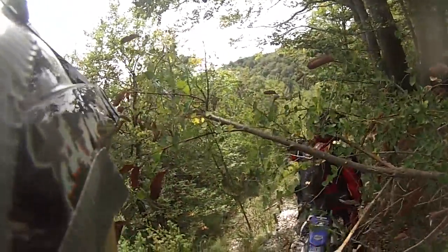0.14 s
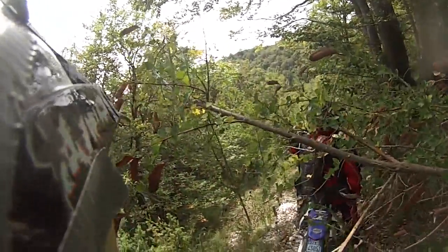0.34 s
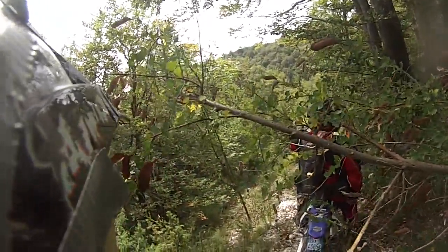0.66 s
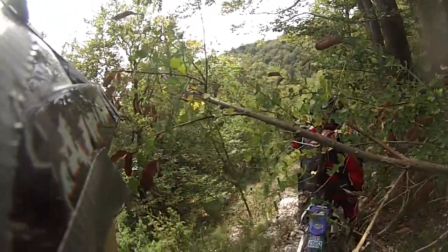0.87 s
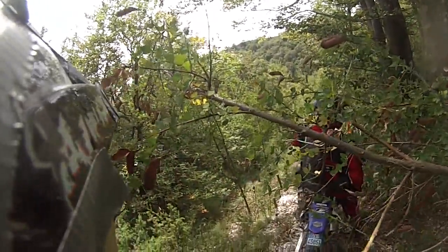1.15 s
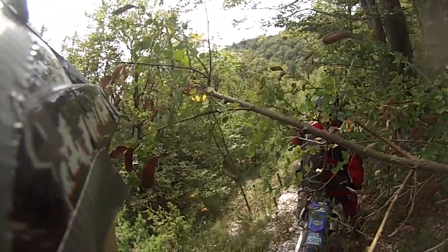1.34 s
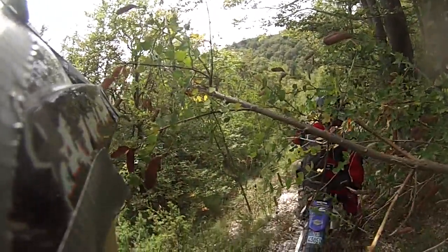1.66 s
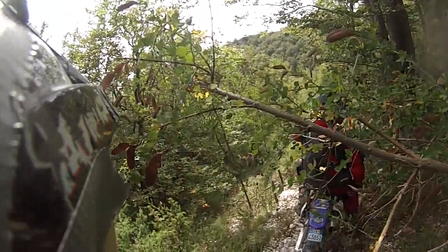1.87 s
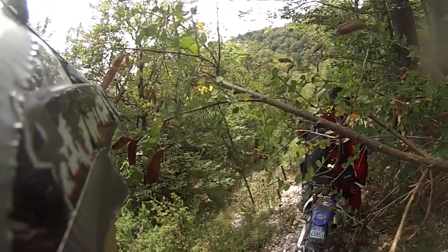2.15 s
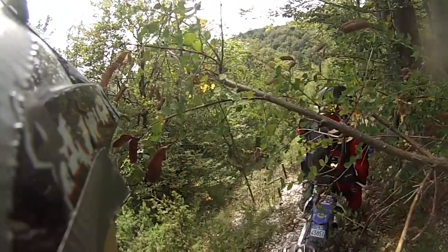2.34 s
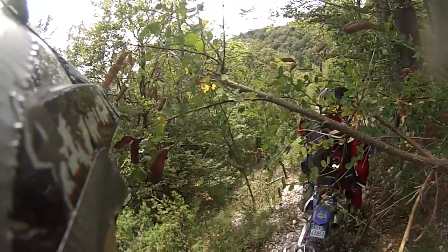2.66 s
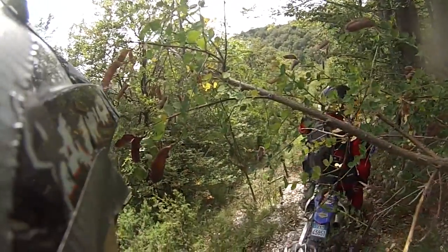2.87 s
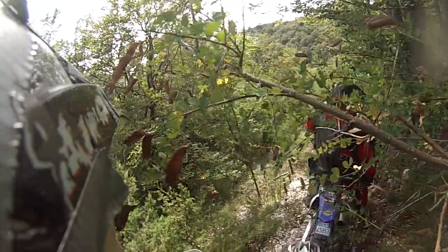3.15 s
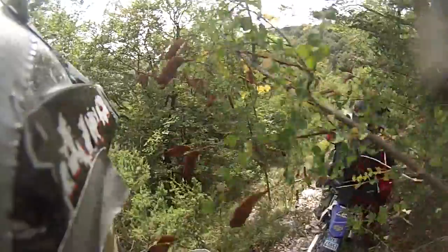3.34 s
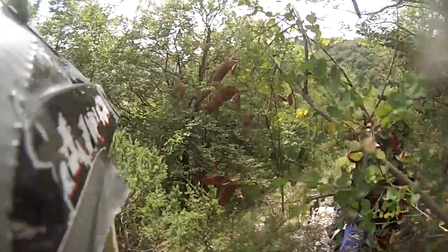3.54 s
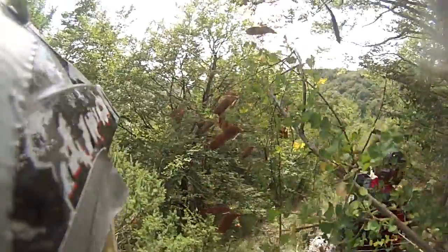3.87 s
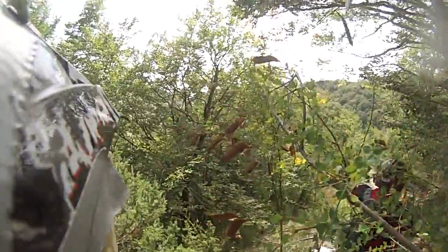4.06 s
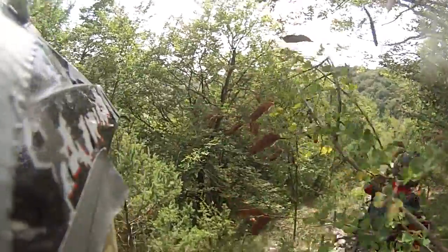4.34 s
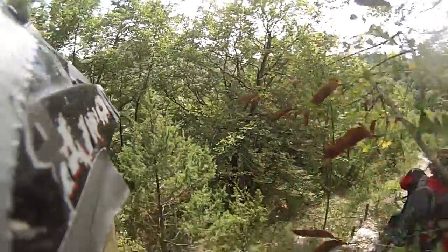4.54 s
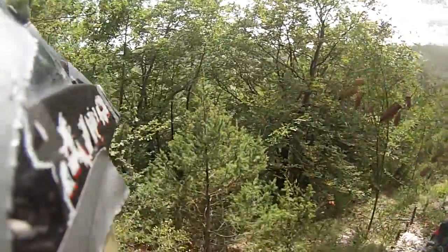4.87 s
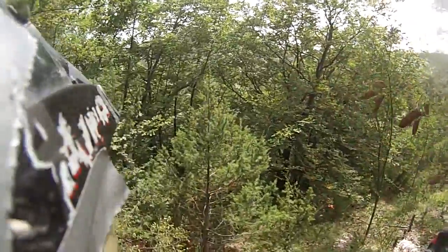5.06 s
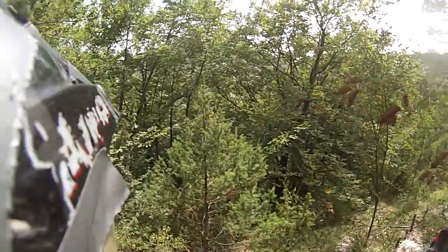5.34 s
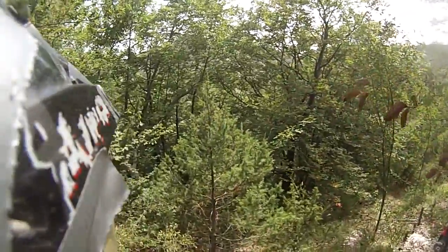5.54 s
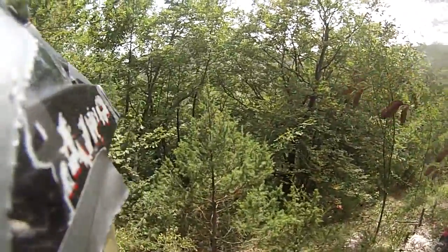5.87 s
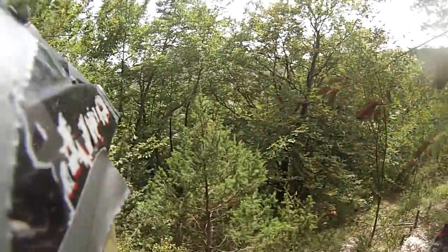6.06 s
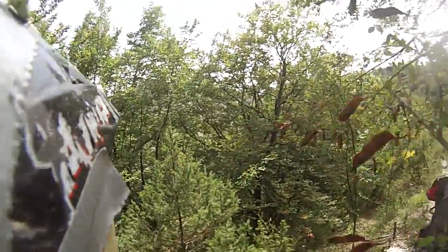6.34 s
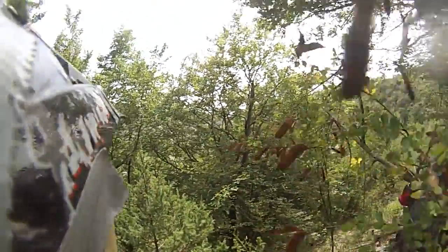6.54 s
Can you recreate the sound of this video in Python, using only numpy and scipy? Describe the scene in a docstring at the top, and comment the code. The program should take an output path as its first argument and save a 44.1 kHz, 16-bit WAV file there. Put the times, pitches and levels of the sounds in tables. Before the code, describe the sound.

Wind hisses through woodland while twigs flick and drag across a helmet with hard clicks, dry crackles and a few low thumps.

```python
"""In woodland scrub, a rider pushes along with a camera fixed to the helmet.
Wind hisses, leaves brush past, and a low rush and a faint whine lie underneath.
Twigs scrape and flick the helmet's shell; each hit is a hard click that rings briefly in shell and
camera case. Dry twigs crackle, a short, low thump comes with the hardest hits,
and a bent branch creaks across the helmet as its bark sticks and slips."""
import sys
import numpy as np
from scipy import signal
from scipy.fft import rfft, irfft
from scipy.io import wavfile
from scipy.ndimage import uniform_filter1d

SR = 44100
rng = np.random.default_rng(int(sys.argv[2]) if len(sys.argv) > 2 else 0)


def file_out(sig):
    """Save sig as 16-bit WAV at sys.argv[1]."""
    # one column per channel
    cols = np.atleast_2d(sig).T
    # limit, then scale
    lim = np.clip(cols, -1, 1)
    pcm = np.round(lim * 32767).astype(np.int16)
    wavfile.write(sys.argv[1], SR, pcm)


N = 295821

# the middle of each of the five pitch bands of a twig's blow: pitch_hz
BAND_CENTRES = [1000, 1700, 2800, 4800, 7000]


def amp(db):
    """Turns decibels into a number to multiply a sound by."""
    return 10 ** (np.asarray(db) / 20)


def evened(x):
    """Scales a signal to an average size (rms) of 1."""
    return x / np.sqrt(np.mean(x ** 2) + 1e-20)


def read(points, hz):
    """Looks up pitches in a table, joining its rows by lines on an octave scale."""
    pitches, values = np.transpose(points)
    return np.interp(np.log(hz + 1), np.log(pitches + 1), values)


def level(rows):
    """Turns rows of time_s, level_db into a gain for every sample."""
    return amp(np.interp(np.arange(N) / SR, *np.transpose(rows)))


def wander(points, samples=N):
    """A smooth random curve through this many points."""
    return evened(signal.resample(rng.standard_normal(points), samples))


def add(mix, start_s, sound):
    """Mixes a sound in at its start time."""
    part = mix[round(start_s * SR):][:len(sound)]
    part += sound[:len(part)]


def causal(db):
    """A filter with these gains that rings only after it is hit, never before."""
    log_gain = np.log(amp(np.concatenate([db, db[-2:0:-1]])))
    return np.exp(np.conj(signal.hilbert(log_gain)))[:len(db)]


def airy(colour, patchy_db):
    """Noise with drifting louder patches, heard through two close openings in the camera case."""
    # how alike left and right are: pitch_hz, likeness
    likeness = [(100, .915), (400, .945), (800, .965), (1600, .935), (3000, .905), (5000, .88), (8000, .8)]
    # pitches the case lifts or dulls: pitch_hz, width_hz, gain_db
    case_tones = [(227, 24, -7.5), (323, 73, 1.5), (744, 170, -1.5), (930, 27, 4), (1648, 67, 5),
                  (2887, 206, 10), (3297, 120, -9.5), (4290, 430, -3.5), (4816, 290, -13.5)]
    frames, hz = N // 256 + 5, np.fft.rfftfreq(1024, 1 / SR)
    a, b, c, d, patches = rng.standard_normal((5, frames, len(hz)))
    patches = evened(uniform_filter1d(uniform_filter1d(patches, size=14, axis=0), size=10, axis=1))
    same, left = read(likeness, hz), a + 1j * b
    right = same * left + np.sqrt(1 - same ** 2) * (c + 1j * d)
    case_db = sum(db * np.exp(-((hz - pitch) / width) ** 2) for pitch, width, db in case_tones)
    spectra = np.array([left, right]) * amp(read(colour, hz) + case_db + patchy_db * patches)
    return evened(signal.istft(spectra.transpose(0, 2, 1), nperseg=1024, noverlap=768)[1][:, :N])


def wind():
    """Wind in the treetops: a nearly steady hiss."""
    # how the wind rises and falls: time_s, level_db
    swell = [(0.0, -38), (0.97, -37), (1.6, -38), (2.6, -38), (3.51, -39.5), (4.52, -37.5), (4.76, -41.5),
             (6.7, -39.5)]
    # tone of the hiss: pitch_hz, gain_db
    colour = [(20, -19), (220, -11.5), (400, -8), (570, -1.5), (760, 6), (950, 0), (1150, -2.5),
              (1500, -8.5), (2050, -14), (2350, -9.5), (2900, -26), (4100, -20), (5600, -29.5), (7500, -43),
              (10000, -57.5)]
    return level(swell) * airy(colour, patchy_db=1)


def valley_rush():
    """The steady low rush of the valley."""
    # tone of the rush: pitch_hz, gain_db
    colour = [(10, -21), (25, -6), (60, -11), (160, -6.5), (220, -12.5), (300, -2), (450, -1.5), (600, -1),
              (900, -19), (2000, -24.5), (6000, -65.5)]
    return airy(colour, patchy_db=1.5)


def whine(waver=0.0016, flutter_db=2.2):
    """A thin tone with a weak overtone, wavering in pitch and level."""
    # the pitch lifts a little, then sags: time_s, pitch_hz
    glide = [(0, 607.7), (2.5, 610.6), (4.5, 607.5), (6.7, 602)]
    # the tone and its overtone: pitch_multiple, level_db
    tones = [(1, -49), (3, -65)]
    pitch_hz = np.interp(np.arange(N) / SR, *np.transpose(glide)) * (1 + waver * wander(50))
    turns = np.cumsum(pitch_hz) / SR
    tone = sum(np.sqrt(2) * amp(db) * np.sin(2 * np.pi * multiple * turns) for multiple, db in tones)
    return evened(amp(flutter_db * wander(50))) * tone


def leaves():
    """Leaves slide by, louder once the rider is in the thicket."""
    # how the rustle grows: time_s, level_db
    swell = [(0, -70), (1.5, -65), (3.15, -53), (3.6, -45.5), (4.1, -51), (4.6, -48), (4.9, -47.5),
             (6.7, -47.5)]
    # tone of the rustle: pitch_hz, gain_db
    colour = [(300, -29.5), (1200, 6.5), (2400, 16.5), (3000, 1.5), (3800, 9.5), (4500, 13), (5000, 9.5),
              (6000, -43), (9000, -37.5)]
    return level(swell) * airy(colour, patchy_db=2.5)


def shell_ring(t):
    """Shell and camera case ring; each spot wakes their notes in its own mix, slightly retuned."""
    # their notes: pitch_hz, level_db, ring_s (time to fade by 60 dB)
    notes = [(741, -23, 0.042), (950, -30.5, 0.008), (1230, -27.5, 0.023), (1828, -17, 0.021),
             (2096, -24.5, 0.03), (2410, -20, 0.019), (2752, -11.5, 0.011), (3000, -35, 0.058),
             (3428, -26.5, 0.046), (3940, -23, 0.029), (4850, -20, 0.024), (5400, -11.5, 0.0077),
             (6310, -17.5, 0.012), (6800, -19, 0.03), (8650, -25, 0.016)]
    hz, db, ring_s = np.transpose(notes)[:, :, None]
    share, detune = rng.uniform(.3, 1, hz.shape), rng.uniform(.985, 1.015, hz.shape)
    return (share * amp(db - 60 * t / ring_s) * np.cos(2 * np.pi * hz * detune * t)).sum(0)


def rubbing(spots=4, slips_per_s=260, spread_db=4, clump_db=3.5, bright=0.13):
    """Twig tips stick and slip at several spots, sending tiny uneven clicks into the shell."""
    t, rubbed = np.arange(2048) / SR, np.zeros(N)
    for _ in range(spots):
        sizes = amp(spread_db * np.minimum(rng.exponential(1, N), 4)) * rng.choice([-1, 1], N)
        clumps = amp(clump_db * wander(400))  # each tip catches and lets go
        clicks = sizes * clumps * (rng.random(N) < slips_per_s / SR)
        ring = signal.lfilter([1, -bright], [1], shell_ring(t))
        rubbed += signal.oaconvolve(clicks, ring)[:N]
    return rubbed


def scrape(rise_share=0.45, ends_db=-21, scratch_db=9, scratch_octaves=0.27):
    """Each dragging tip presses in and slides off, scratching at a pitch of its own."""
    # a twig tip or leaf dragging over the shell: peak_s, level_db, length_s, pitch_hz
    drags = [(0.348, -44, 0.031, 5100), (0.364, -47, 0.086, 5300), (1.14, -45.5, 0.21, 6300),
             (1.285, -45.5, 0.1, 6200), (3.35, -52, 0.49, 6800), (3.98, -44, 1.2, 1500),
             (4.1, -45, .09, 4800), (4.45, -41, .08, 6700), (4.473, -28, 0.072, 2300),
             (4.603, -36.5, 0.26, 3900), (4.896, -27, 0.039, 4770), (6.224, -28, 0.094, 1160),
             (6.38, -38, 0.27, 3000), (6.577, -50, 0.29, 4000)]
    # tone of the dragging: pitch_hz, gain_db
    colour = [(40, -32), (400, -20.5), (800, 20), (1800, 3), (2800, 12.5), (4000, 6.5), (5500, 4),
              (7000, -8.5), (8000, -24.5), (9800, -37)]
    hz = np.fft.rfftfreq(2048, 1 / SR)
    rubbed, now, out = rubbing(), np.arange(N) / SR, np.zeros(N)
    for peak_s, db, length_s, tip_hz in drags:
        from_peak = np.maximum((peak_s - now) / rise_share, (now - peak_s) / (1 - rise_share)) / length_s
        touching = from_peak < 2  # 1 at each end of the drag; the fade runs on to 2
        tip_db = scratch_db * np.exp(-(np.log2((hz + 1) / tip_hz) / scratch_octaves) ** 2)
        tone_filter = irfft(causal(read(colour, hz) + tip_db))
        scratch = signal.fftconvolve(rubbed[touching], tone_filter)[:touching.sum()]
        out[touching] += amp(db + ends_db * from_peak[touching]) * evened(scratch)
    return out


def blow_bands(db, spot_hz, fall_below, fall_above):
    """A blow's level in each band: light twigs give less below the spot's pitch, soft ones less above."""
    # change in each band an octave or more from the struck spot's pitch: gain_db
    off_spot_db = [1.5, -3, -3, -1, -2]
    octaves = np.log2(np.array(BAND_CENTRES) / spot_hz)
    off_spot = np.array(off_spot_db) * np.minimum(abs(octaves), 1)
    return db + off_spot + fall_below * np.minimum(octaves, 0) - fall_above * np.maximum(octaves, 0)


def strike(band_db, spot_hz, ring_s, slip=0.36, spot_db=-7, chatter_db=-19, chatter_s=0.029):
    """A twig lands, slips for a millisecond or so and chatters off; the shell and the struck spot ring."""
    # tone of the contact: pitch_hz, gain_db
    colour = [(40, -14.5), (250, -20), (550, -7), (880, 2), (3000, 8.5), (7000, -7), (8500, -10),
              (9800, -30)]
    # borders of the five bands: pitch_hz
    band_edges = [500, 1200, 2200, 3600, 6000, 10000]
    t, hz = np.arange(4096) / SR, np.fft.rfftfreq(4096, 1 / SR)
    slips, chatter = rng.standard_normal((2, len(t)))
    press = t / (.0004 + .03 * ring_s)  # glancing blows press in more slowly and sound longer
    blow = (t == 0) + slip * slips * press * np.exp((1 - press ** 2) / 2)
    chatter *= amp(chatter_db - 60 * t / chatter_s)  # too light to click, it keeps the shell ringing
    spot = amp(spot_db - 60 * t / ring_s) * np.sin(2 * np.pi * spot_hz * t) * (1 - np.exp(-2 * press))
    shell = rfft(blow + chatter) * rfft(shell_ring(t))
    spectrum = (rfft(blow) + shell) / np.linalg.norm(blow) + rfft(spot)
    spectrum *= causal(read(colour, hz))
    # the twig's stiffness and weight set how its energy is shared among the bands
    for _ in range(3):
        energy = np.add.reduceat(abs(spectrum) ** 2, np.searchsorted(hz, band_edges))[:-1] * 2 / len(t)
        power_db = 10 * np.log10(energy / (.01 * SR))  # spread over 10 ms
        spectrum *= causal(read(np.c_[BAND_CENTRES, band_db - power_db], hz))
    return irfft(spectrum)


def twigs():
    """Twigs flick the helmet, each with a hard ringing click."""
    # one hit a row: start_s, level_db, pitch_hz, fall_below_db_per_octave, fall_above_db_per_octave, ring_s
    hits = [(1.2513, -15.5, 950, 5, 6.5, 0.026), (1.2508, -20.5, 6770, 8, 9, 0.012),
            (1.2521, -16, 1737, 5, 21, 0.016), (1.2545, -31, 5050, 17, 14, 0.023),
            (1.273, -37, 1810, 12, 12, 0.034), (3.172, -27.5, 950, 5, 8.5, 0.045),
            (3.325, -49.5, 6800, 21, 12, 0.038), (3.386, -29, 950, 5, 6.5, 0.064),
            (3.785, -43.5, 7570, 17, 5, 0.01), (3.811, -46.5, 6300, 12, 17, 0.02),
            (3.8936, -26.5, 1050, 5, 6.5, 0.024), (3.8944, -36, 7150, 18, 5, 0.011),
            (3.9178, -29, 1290, 7, 25, 0.014), (3.9468, -18, 1500, 21, 12, 0.023),
            (3.9536, -16.5, 1690, 11.5, 10, 0.0043), (3.9615, -25.5, 1490, 8, 20, 0.055),
            (3.976, -30, 1127, 9, 10, 0.078), (4.0167, -23.5, 900, 5, 21, 0.046),
            (4.0659, -25.5, 963, 3, 9, 0.046), (4.067, -32.5, 4860, 21, 43, 0.017),
            (4.0831, -29, 2200, 6, 8.5, 0.015), (4.1015, -33.5, 1640, 4, 13, 0.035),
            (4.147, -35.5, 5550, 12, 27, 0.01), (4.157, -46, 5800, 11, 14, 0.008),
            (4.1997, -23.5, 6220, 22, 9, 0.02), (4.2942, -19, 1330, 27, 15, 0.013),
            (4.296, -26.5, 4730, 27, 31, 0.038), (4.2988, -27.5, 1370, 4, 18, 0.039),
            (4.3634, -32, 1360, 6, 18, 0.02), (4.4114, -22, 5480, 10.5, 23, 0.008),
            (4.444, -42, 6440, 9, 22, 0.046), (4.4642, -16.5, 2580, 14.5, 6, 0.018),
            (4.5144, -33, 5070, -1, -1, 0.028), (4.5638, -21.5, 2730, 15, 5.5, 0.033),
            (4.625, -33, 3950, 5, 24, 0.025), (4.657, -19, 2900, 25, 20, 0.039),
            (4.664, -10, 2660, 17.5, 10.5, 0.028), (4.6728, -15, 2560, 5, 3.5, 0.013),
            (4.687, -21, 3900, 10, 15, 0.017), (4.705, -19, 2950, 13, 14, .011),
            (4.7099, -14, 2880, 5.5, 17, 0.008), (4.7138, -14, 2570, 14, 16.5, 0.016),
            (4.7198, -20.5, 2620, 9, 6, 0.012), (4.7552, -29.5, 3920, 23, 9, 0.012),
            (4.7586, -30, 3700, 21, 9, 0.0095), (4.8871, -10, 927, 3, 8, 0.015),
            (4.8924, -12.5, 990, 9, 23, 0.015), (4.894, -29, 6150, 14, 24, 0.058),
            (4.908, -29.5, 1750, 18, 16, 0.02), (6.1942, -18.5, 2760, 12.5, 8.5, 0.021),
            (6.3011, -21.5, 2800, 0.5, 7.5, 0.05), (6.3182, -26, 1900, 4, 26, 0.026),
            (6.3255, -29.5, 2980, 5, 36, 0.017), (6.3659, -16.5, 3400, 8, 25, 0.059),
            (6.374, -20, 2970, 9, 13, 0.014), (6.377, -13, 2980, 12.5, 11.5, 0.014),
            (6.384, -25, 3000, 17, 25, 0.029), (6.4105, -14.5, 5580, 12, 17.5, 0.0048),
            (6.4117, -11.5, 3070, 25, 17, 0.018), (6.431, -14.5, 2780, 8.5, 17.5, 0.023),
            (6.4342, -19, 2590, 10.5, 21, 0.026), (6.4898, -20.5, 2770, 6.5, 13, 0.012),
            (6.491, -15, 5380, 4, 28, 0.015), (6.519, -40, 2950, 6, 9, 0.034),
            (6.6818, -35, 5500, 9, 4, 0.008), (6.686, -13, 6160, 15.5, 15, 0.0081),
            (6.6854, -16, 2560, 13, 7.5, 0.033)]
    out = np.zeros(N)
    for start_s, db, spot_hz, fall_below, fall_above, ring_s in hits:
        add(out, start_s, strike(blow_bands(db, spot_hz, fall_below, fall_above), spot_hz, ring_s))
    return out


def crackle(low_hz=1050, high_hz=2300, notes=12, ticks_per_s=70, spread_db=4, rise_s=.0003, ring_s=.016):
    """Thin dry twigs tick at random, each with a short woody note."""
    # how the crackling comes and goes: time_s, level_db
    swell = [(3.0, -62), (3.8, -54), (3.97, -41.5), (4.1, -38), (4.2, -61), (4.32, -37.5), (4.62, -46),
             (4.8, -64), (6.1, -66.5), (6.3, -45), (6.7, -55.5)]
    t, out = np.arange(1024) / SR, np.zeros(N)
    for hz in np.geomspace(low_hz, high_hz, notes):
        tick = (1 - np.exp(-t / rise_s)) * amp(-60 * t / ring_s) * np.sin(2 * np.pi * hz * t)
        sizes = amp(spread_db * np.minimum(rng.exponential(1, N), 2))
        ticking = rng.random(N) < ticks_per_s / notes / SR
        out += signal.oaconvolve(sizes * ticking, tick)[:N]
    return level(swell) * evened(out)


def thumps(cycles_to_fade=2.1):
    """A short, low thump comes with the hardest hits and soon dies away."""
    # one thump a row: start_s, level_db, pitch_hz
    rows = [(4.081, -29, 60), (4.396, -32, 60.4), (4.668, -23, 55), (4.702, -26, 30), (4.75, -26, 42),
            (4.887, -29, 28), (6.302, -29, 55), (6.378, -31, 45), (6.425, -24.5, 51.7), (6.684, -31, 75)]
    out, t = np.zeros(N), np.arange(8192) / SR
    for start_s, db, hz in rows:
        wave = -np.sin(2 * np.pi * hz * t) * (1 - np.exp(-2 * np.pi * hz * t))
        add(out, start_s, amp(db - 60 * hz * t / cycles_to_fade) * wave)
    return out


def creak(branch_db=-12, ring_s=0.083, jitter=.025, uneven_db=1.5):
    """Bark sticks and slips almost evenly; every slip rings branch and shell, making a short rasp."""
    # the branch's slide across the shell: time_s, level_db, slips_per_s
    slide = [(4.697, -34, 246), (4.701, -17, 234), (4.711, -18, 290), (4.72, -18.5, 304),
             (4.726, -20.5, 306), (4.734, -19, 305), (4.74, -30, 200), (4.746, -25.5, 350),
             (4.751, -48, 300)]
    # notes of the bent branch: pitch_hz, level_db
    notes = [(1486, -29.5), (1790, -32), (2522, -23), (2750, -21.5), (3030, -22), (3670, -28.5),
             (3960, -36), (4310, -29), (5500, -34), (5850, -30), (6100, -39), (6525, -32), (8560, -28)]
    # tone of the creak: pitch_hz, gain_db
    colour = [(40, -25), (400, -4), (800, 1), (1600, 4), (1950, -3), (2200, -11), (2500, 5), (3500, 7),
              (5000, 1), (6800, 4), (7500, -14), (8500, -14), (9800, -32)]
    times, db, rate = np.transpose(slide)
    t, hz = np.arange(2048) / SR, np.fft.rfftfreq(2048, 1 / SR)
    now = np.arange(times[0], times[-1], 1 / SR)
    slip_count = np.cumsum(np.interp(now, times, rate) * (1 + jitter * wander(12, len(now)))) / SR
    slips = np.diff(np.floor(slip_count), prepend=-1) * amp(uneven_db * rng.standard_normal(len(now)))
    note_hz, note_db = np.transpose(notes)[:, :, None]
    fades = amp(branch_db + note_db - note_db.max() - 60 * t / ring_s)
    branch = (fades * np.cos(2 * np.pi * note_hz * t)).sum(0)
    ring = np.convolve(shell_ring(t) / 2 + branch, irfft(causal(read(colour, hz))))
    rasp = evened(signal.fftconvolve(slips, ring)[:len(now)])
    out = np.zeros(N)
    add(out, times[0], amp(np.interp(now, times, db)) * rasp)
    return out


def slight_width(x, side_db=-19.5, size=128):
    """Left and right are equally loud but slightly out of step, widening the sound a little."""
    scatter = np.fft.fftshift(irfft(1j * rng.choice([-1, 1], size // 2 + 1)))
    side = amp(side_db) * np.convolve(x, scatter)[size // 2:][:N]
    return np.array([x + side, x - side])


def scene():
    """Twigs and a branch meet the helmet over wind, valley rush, leaves and the whine."""
    contacts = amp(-1.41) * twigs() + scrape() + creak() + crackle() + thumps()
    air = amp(1) * wind() + amp(-45) * valley_rush() + leaves()
    return slight_width(contacts + whine()) + air


def record(dry, ceiling=.88, top_hz=10000):
    """Overload rounds off the hardest clicks, then the highest treble is cut away."""
    rounded = dry / (1 + (dry / ceiling) ** 6) ** (1 / 6)
    treble_cut = signal.firwin(255, top_hz, window=("kaiser", 8), fs=SR)
    return signal.oaconvolve(rounded, treble_cut[None], "same")


dry = scene()
out = record(dry)
file_out(out)
```